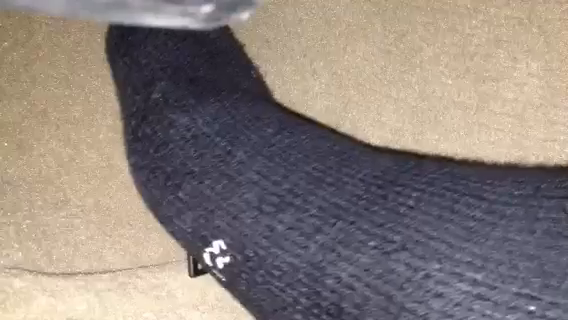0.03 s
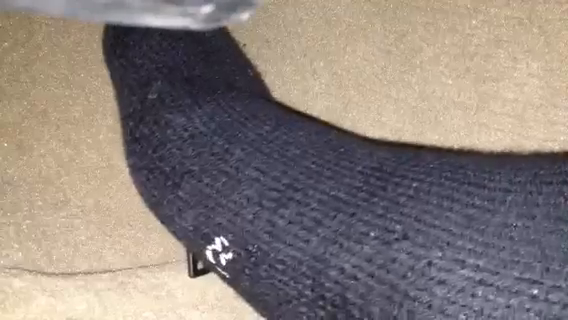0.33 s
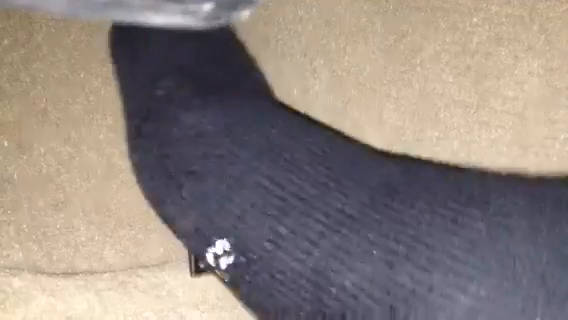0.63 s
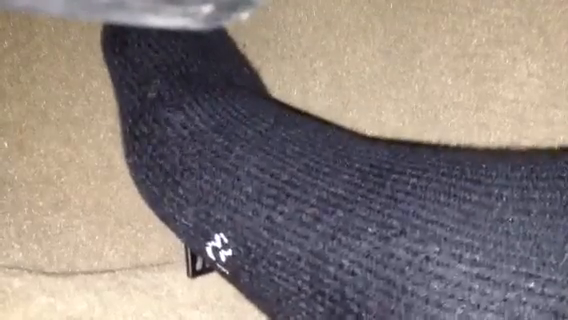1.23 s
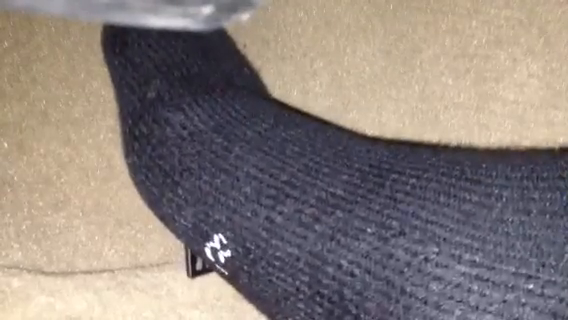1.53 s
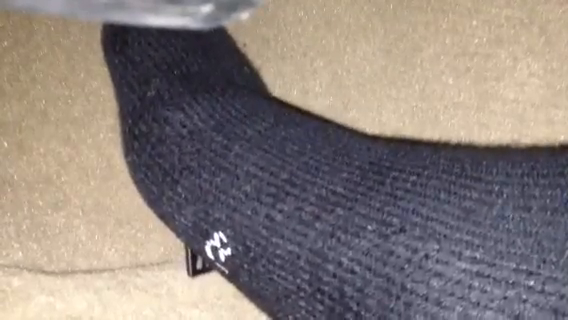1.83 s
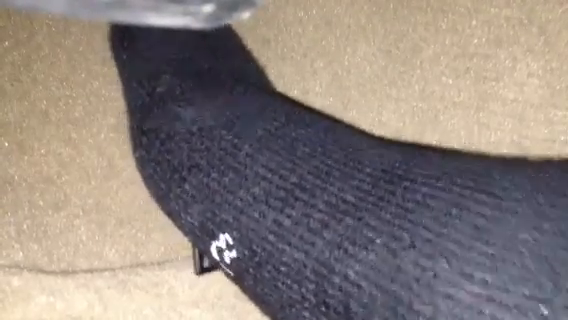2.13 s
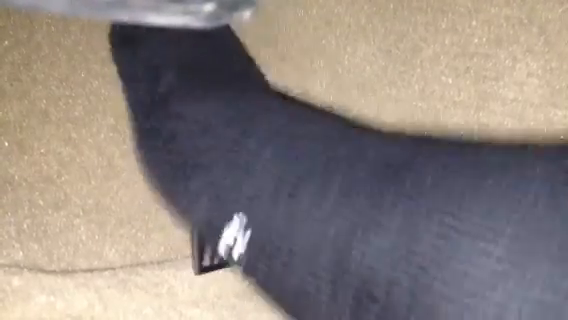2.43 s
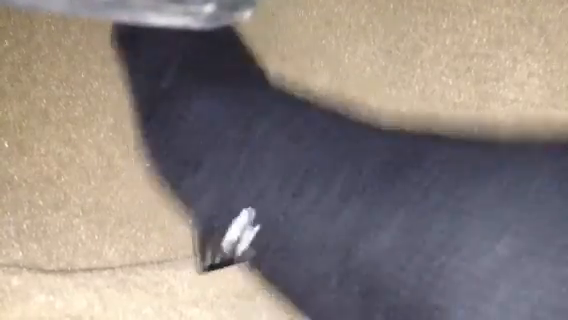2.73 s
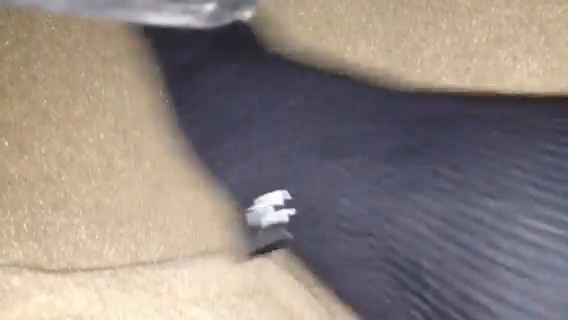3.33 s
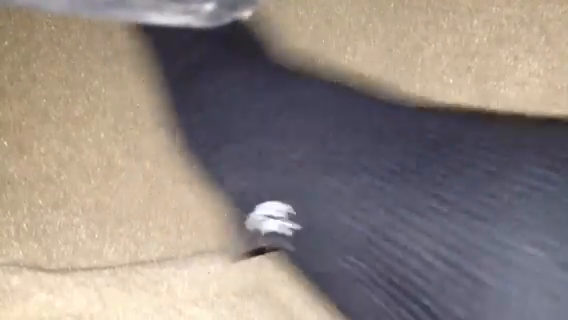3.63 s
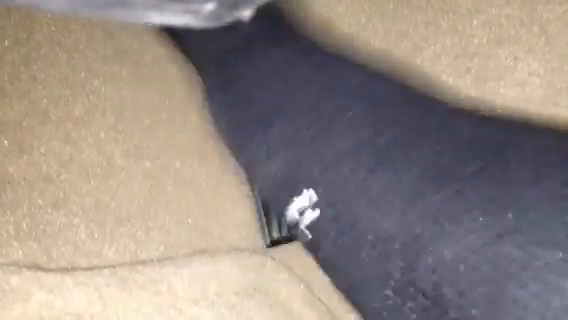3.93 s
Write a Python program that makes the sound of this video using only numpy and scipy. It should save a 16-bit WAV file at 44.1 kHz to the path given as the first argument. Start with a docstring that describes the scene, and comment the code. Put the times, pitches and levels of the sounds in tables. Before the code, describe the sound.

A plastic foot pedal clacks close by in a small carpeted room. It squeaks faintly at the start as a sewing machine settles into soft, rapid chugging, with a low hum and dull knocks. Single pedal clicks come at about 0.6 and 1.6 seconds. From 2.4 to 3.8 seconds the pedal is pumped six times, each push a stocking swish, sharp clack and floor thump, with smaller clicks between.

```python
"""Stockinged foot on a machine pedal

Close by in a small carpeted room, what sounds like a sewing machine runs up to speed and chugs on,
with a low hum, a faint whine and dull knocks from its frame. Its plastic pedal squeaks, clicks twice,
then is pumped against its stop: each push is a swish of stocking, a sharp clack and a floor thump."""
import sys
import numpy as np
from scipy import signal
from scipy.fft import rfft, irfft, next_fast_len
from scipy.io import wavfile
from scipy.ndimage import uniform_filter1d, map_coordinates

SR = 44100
rng = np.random.default_rng(int(sys.argv[2]) if len(sys.argv) > 2 else 0)


def int16_out(signal):
    """Quantize to a 16-bit WAV file."""
    q = np.round(np.clip(np.atleast_2d(signal).T, -1, 1) * 32767)
    wavfile.write(sys.argv[1], SR, q.astype(np.int16))


N = 176400
PUMPING_START_S = 2.08  # from here the stocking rustles and the machine's strokes soften


def amp(db):
    """Decibels to gain."""
    return 10 ** (np.asarray(db) / 20)


def unit(x):
    """Scale to rms 1."""
    return x / np.sqrt(np.mean(x ** 2) + 1e-20)


def clock(size):
    """Seconds for each sample."""
    return np.arange(size) / SR


def filtered(x, response):
    """Filter x by a response given as a function of frequency."""
    size = next_fast_len(len(x) + SR // 2)
    return irfft(rfft(x, size) * response(np.fft.rfftfreq(size, 1 / SR)), size)[:len(x)]


def eq_gain(colour, f):
    """Gain at frequencies f of a colour: an EQ curve whose rows are frequency in Hz, relative dB."""
    hz, db = np.transpose(colour)
    return amp(np.interp(np.log(f + 1), np.log(hz), db))


def noise(colour):
    """Coloured noise of rms 1."""
    return unit(filtered(rng.standard_normal(N), lambda f: eq_gain(colour, f)))


def burst(colour, envelope, white):
    """A very short noise hit, roughly flattened and then given its colour."""
    spectrum, f = rfft(white * envelope), np.fft.rfftfreq(len(envelope), 1 / SR)
    coarse = np.sqrt(np.abs(uniform_filter1d(np.abs(spectrum) ** 2, size=161)) + 1e-20)
    hit = irfft(spectrum / coarse * eq_gain(colour, f), len(envelope))
    hit[len(hit) // 2:] = 0  # drop the filter's wrapped-around pre-ring
    return unit(hit) * np.sqrt(np.mean(envelope ** 2))


def wobble(rate):
    """A smooth random curve, rate knots a second."""
    return map_coordinates(rng.standard_normal(int(N * rate / SR) + 4), [clock(N) * rate])


def fade(t, t60):
    """Exponential decay, 60 dB down after t60 seconds."""
    return amp(-60 * t / t60)


def strike(t, attack_s, t60_s, decay_from_s=0):
    """A percussive envelope: linear attack, exponential decay."""
    return np.minimum(t / attack_s, 1) * fade(np.maximum(t - decay_from_s, 0), t60_s)


def swell(middle_s, half_s):
    """A bell-shaped rise and fall."""
    return np.exp(-((clock(N) - middle_s) / half_s) ** 2 / 2)


def ring(modes, t, scatter_db, ratio):
    """Damped modes, the k-th weighted by ratio ** k; a negative ratio alternates their polarity."""
    out = np.zeros(len(t))
    for k, (hz, db, t60) in enumerate(modes):
        gain = ratio ** k * amp(db + scatter_db * rng.standard_normal())
        out += gain * fade(t, t60) * np.sin(2 * np.pi * hz * t)
    return out


def add(track, start_s, sound):
    """Mix a sound in at a time."""
    part = track[max(0, round(start_s * SR)):][:len(sound)]
    part += sound[:len(part)]


def machine():
    """Strokes tap and chug over a growing hum; the motor's whine climbs once in every stroke."""
    # Colours of the soft chug, light tap and low hum. Each row: frequency in Hz, relative level in dB.
    chug_colour = [(60, -41), (130, 2.5), (260, 1), (390, -1.5), (480, -13), (560, -5), (650, -26),
                   (800, -16), (1150, -21), (1500, -27.5), (2000, -38), (5000, -40.5), (15000, -60)]
    tap_colour = [(150, -24), (380, 7.5), (560, -8), (670, 4.5), (820, 3.5), (1150, -7.5), (1500, 0),
                  (1900, -22), (4000, -24), (15000, -54)]
    hum_colour = [(20, -29), (45, -51), (70, -13.5), (105, -6), (135, -3), (165, 2), (205, -5.5),
                  (280, -9.5), (400, -16), (600, -24), (1000, -32), (2000, -67), (8000, -57.5)]
    # The hum's slow build. Each row: time in seconds, level in dB.
    hum_build = [(0, -58.5), (.28, -54), (.55, -52.5), (1.1, -51), (2.2, -50.5), (3, -49.5), (4, -48.5)]
    settled_start_s, stroke_s, run_up_s, run_up_strokes = 0.1621, 0.0862, 0.091, 1.2
    chug_db, scatter_db, tap_db, tap_lead_s, ease_db, waver_db = -50.5, 1.5, -56, 0.015, -1.5, 0.73
    whine_db, base_hz, sweep_hz, run_up_hz, whine_lag_s = -82, 10700, 1000, 2440, 0.018
    t, k = clock(N), np.arange(int(N / SR / stroke_s) + 2)
    # The strokes quicken and settle to a steady beat.
    times = settled_start_s + k * stroke_s - run_up_s * np.exp(-k / run_up_strokes)
    gains = amp(chug_db + scatter_db * rng.standard_normal(len(k)))
    chugs = sum(gain * swell(s, half_s=0.014) for s, gain in zip(times, gains)) * noise(chug_colour)
    tap = amp(tap_db) * strike(clock(SR // 5), attack_s=0.008, t60_s=0.095, decay_from_s=0.008)
    tap_envelope = np.zeros(N)
    for s in times[1:]:
        add(tap_envelope, s - tap_lead_s, tap)
    hum = amp(np.interp(t, *np.transpose(hum_build)) + waver_db * wobble(18)) * noise(hum_colour)
    turns = np.interp(t - whine_lag_s, times, k)
    whine_hz = base_hz + sweep_hz * (turns % 1) - run_up_hz * np.exp(-turns / run_up_strokes / 2)
    whine = amp(whine_db) * np.sin(np.pi * (turns % 1)) * np.sin(2 * np.pi * np.cumsum(whine_hz) / SR)
    ease = amp(ease_db * (t > PUMPING_START_S))
    return ease * (chugs + tap_envelope * noise(tap_colour)) + hum + whine


def room_air():
    """A faint, steady bed of hiss."""
    # The colour of the air. Each row: frequency in Hz, relative level in dB.
    air_colour = [(100, 9.5), (1500, 6), (3000, 1.5), (4500, 0.5), (7000, 3.5), (8500, 1), (10000, -5),
                  (12000, 0.5), (15500, -2.5)]
    return amp(-68) * noise(air_colour)


def pivot_squeaks():
    """The pedal's pivot gives faint, rough squeaks that sag in pitch."""
    # The squeaks. Each row: start in seconds, length in seconds, opening pitch in Hz, level in dB.
    squeaks = [(.023, .014, 890, -52), (0.02, 0.074, 1310, -60), (0.164, 0.016, 900, -58),
               (0.212, 0.02, 1310, -62)]
    sag_per_s, roughness = 0.6, 0.05
    out = np.zeros(N)
    for s, length, hz, db in squeaks:
        t = clock(int(length * SR))
        pitch = hz * (1 - sag_per_s * t + roughness * wobble(380)[:len(t)])
        arch = np.sqrt(np.abs(np.sin(np.pi * t / length)))
        add(out, s, amp(db) * arch * np.sin(2 * np.pi * np.cumsum(pitch) / SR))
    return out


def frame_thuds():
    """Dull, quickly damped knocks of the machine's frame."""
    # The knocks. Each row: start in seconds, pitch in Hz, level in dB.
    thuds = [(.198, 325, -41.5), (0.309, 273, -38.5), (.756, 300, -40.5), (1.185, 298, -37.5),
             (1.448, 260, -41), (1.622, 235, -37), (2.104, 229, -36), (2.302, 257, -33),
             (3.912, 212, -34.5)]
    overtone_ratio, overtone_db = 1.552, -10
    out, t = np.zeros(N), clock(SR // 4)
    envelope = strike(t, attack_s=0.0025, t60_s=0.071)
    for s, hz, db in thuds:
        phase = 2 * np.pi * hz * t
        tone = np.sin(phase) + amp(overtone_db) * np.sin(overtone_ratio * phase)
        add(out, s, amp(db) * envelope * tone)
    return out


def stocking():
    """Fabric slides as the leg moves: a grainy rub and a finer hiss, plus a rustle while it pumps."""
    # The slides. Each row: middle in seconds, half length in seconds, rub in dB, hiss in dB.
    swishes = [(0.437, 0.029, -72, -64.5), (0.587, 0.068, -63.5, -63), (0.671, 0.027, -65, -62.5),
               (2.26, 0.04, -52.5, -62), (2.378, 0.019, -48, -56.5), (2.532, 0.032, -56.5, -65),
               (2.616, 0.046, -49.5, -61), (2.797, 0.04, -54, -58), (2.902, 0.019, -51, -57.5),
               (3.088, 0.03, -50.5, -58), (3.179, 0.022, -47, -55), (3.357, 0.037, -50.5, -56),
               (3.474, 0.022, -47.5, -56), (3.656, 0.031, -49.5, -57), (3.791, 0.042, -49.5, -58.5),
               (3.948, 0.03, -48.5, -56)]
    # Colours of the rub and the hiss. Each row: frequency in Hz, relative level in dB.
    rub_colour = [(100, -36), (250, 4.5), (420, 2.5), (700, 1.5), (1400, -6), (1700, -7), (2300, -4.5),
                  (3100, -11.5), (4500, -15), (6500, -48), (15000, -55)]
    hiss_colour = [(1000, 4), (2800, -8.5), (4500, -1), (6000, 1), (8000, 1), (10000, -4), (13000, -3),
                   (15500, -13.5)]
    rustle_db, rustle_rise_s, rub_grain_db, hiss_grain_db = -63, 0.063, 2, 1.4
    rustle = amp(rustle_db) * np.clip((clock(N) - PUMPING_START_S) / rustle_rise_s, 0, 1)
    rub_power = sum((amp(db) * swell(s, half)) ** 2 for s, half, db, _ in swishes)
    hiss_power = rustle ** 2 + sum((amp(db) * swell(s, half)) ** 2 for s, half, _, db in swishes)
    rub = unit(noise(rub_colour) * amp(rub_grain_db * wobble(250)))
    hiss = unit(noise(hiss_colour) * amp(hiss_grain_db * wobble(400)))
    return np.sqrt(rub_power) * rub + np.sqrt(hiss_power) * hiss


def pedal_stop():
    """Plastic cracks on plastic, the shell clacks and rings, then the pedal thumps the floor."""
    # Hits on the stop. Each row: start in seconds, then thump, clack and crack faders in dB.
    stops = [(0.5696, -38.5, -38.5, -46), (2.3991, -25, -33.5, -30.5), (2.6458, -23.5, -30.5, -29.5),
             (2.9056, -23.5, -30.5, -30), (3.2007, -22.5, -28, -23.5), (3.4941, -24.5, -30, -32.5),
             (3.8207, -29, -35.5, -38.5)]
    # Modes of the shell, and of the pedal on the floor.
    # Each row: frequency in Hz, relative level in dB, time to fall 60 dB in seconds.
    shell_modes = [(578, -2, 0.038), (648.5, -.5, 0.055), (831, -9.5, 0.05), (968, -6, .045),
                   (1330, -1.5, 0.038), (1452, -6, 0.03), (1680, -9.5, 0.033), (2173, -10.5, 0.034),
                   (2868, -6, 0.028), (3560, -8.5, 0.019), (4484, -11.5, 0.033), (7450, -6, 0.018),
                   (8460, -6, 0.012)]
    floor_modes = [(125, -17, 0.27), (174, -6, 0.14), (212, -17, .1), (245, 4.5, 0.056), (323, -4, 0.048),
                   (405, -6, 0.035)]
    # Colours of the bright crack and the woodier clack. Each row: frequency in Hz, relative level in dB.
    crack_colour = [(1000, -4), (3000, -6), (5000, -10.5), (6600, 1), (8300, 0), (9500, -7.5),
                    (12000, -13.5), (15500, -26)]
    clack_colour = [(120, -28), (400, 2), (620, 8), (780, -3), (980, 1.5), (1130, -9.5), (1380, 7),
                    (2000, -9), (3100, -7), (4500, -7.5), (6000, -15), (15000, -32)]
    crack_trim_db, clack_trim_db, contact_s, fresh_noise = 1.5, -1, 0.0012, 0.49
    thump_delay_s, thump_attack_s, low_cut_hz = 0.00553, 0.001, 119
    plastic, thumps, t = np.zeros(N), np.zeros(N), clock(SR // 3)
    crack_envelope = strike(t, attack_s=contact_s, t60_s=0.017, decay_from_s=0.0013)
    clack_envelope = strike(t, attack_s=0.0021, t60_s=0.027, decay_from_s=0.0021)
    shared_noise = rng.standard_normal((2, len(t)))  # makes every hit sound like the same pedal
    for s, thump_db, clack_db, crack_db in stops:
        white = shared_noise + fresh_noise * rng.standard_normal(shared_noise.shape)
        crack = amp(crack_trim_db) * burst(crack_colour, crack_envelope, white[0])
        clack = amp(clack_trim_db) * burst(clack_colour, clack_envelope, white[1])
        shell = ring(shell_modes, t, scatter_db=2.5, ratio=-0.99) * np.minimum(t / contact_s, 1)
        thump = ring(floor_modes, t, scatter_db=0.44, ratio=0.97) * (1 - np.exp(-t / thump_attack_s))
        add(plastic, s, amp(crack_db) * crack + amp(clack_db) * (clack + shell))
        add(thumps, s + thump_delay_s, -amp(thump_db) * thump)
    low_cut = signal.butter(4, low_cut_hz, 'high', fs=SR, output='sos')
    return plastic + signal.sosfilt(low_cut, thumps)


def linkage_clicks():
    """Play in the pedal's linkage: a bright tick and a short snap over a hollow knock."""
    # The clicks. Each row: start in seconds, then tick, snap and knock faders in dB.
    clicks = [(1.601, -39.5, -35, -36.5), (2.584, -62, -40, -47.5), (3.37, -62, -48, -39.5),
              (3.655, -58, -36.5, -40), (3.743, -34, -30.5, -35.5), (3.903, -60, -42, -38.5)]
    # Colours of the tick and the snap. Each row: frequency in Hz, relative level in dB.
    tick_colour = [(2000, -10), (4500, -9), (7000, -0.5), (9000, -13), (11000, -22), (15000, -24)]
    snap_colour = [(120, -28), (600, 0), (1200, 5.5), (1700, -4.5), (2300, -1.5), (3400, -23), (7000, -28),
                   (15000, -44)]
    # Linkage modes. Each row: typical frequency in Hz, relative level in dB, 60 dB decay in seconds.
    knock_modes = [(268, -11, 0.08), (386, 1, 0.085), (520, -4, 0.03)]
    attack_s, pitch_spread = 0.00062, 0.06
    out, t = np.zeros(N), clock(SR // 3)
    tick_envelope, snap_envelope = strike(t, attack_s, t60_s=0.01), strike(t, attack_s, t60_s=0.017)
    for s, tick_db, snap_db, knock_db in clicks:
        tick = burst(tick_colour, tick_envelope, rng.standard_normal(len(t)))
        snap = burst(snap_colour, snap_envelope, rng.standard_normal(len(t)))
        varispeed = 1 + pitch_spread * rng.standard_normal()
        knock = ring(knock_modes, t * varispeed, scatter_db=0, ratio=-1.04)
        add(out, s, amp(tick_db) * tick + amp(snap_db) * snap + amp(knock_db) * knock)
    return out


def room_reverb(x):
    """The short, dull answer of a carpeted room."""
    wet_db, t60_s, damping_hz = -21.5, 0.091, 2200
    t = clock(SR // 2)
    tail = filtered(rng.standard_normal(len(t)) * fade(t, t60_s), lambda f: 1 / (1 + 1j * f / damping_hz))
    return amp(wet_db) * signal.fftconvolve(x, tail / np.linalg.norm(tail))[:N]


def scene():
    """A mono mix: knocks and squeaks get a touch of room; stocking, machine and air stay dry."""
    contacts = pedal_stop() + linkage_clicks() + pivot_squeaks() + frame_thuds()
    return (contacts + room_reverb(contacts) + stocking() + machine() + room_air())[None]


def record(dry):
    """A steep high cut takes off the very top of the treble."""
    high_cut_hz = 15700
    return np.array([filtered(x, lambda f: 1 / (1 + (f / high_cut_hz) ** 160)) for x in dry])


dry = scene()
out = record(dry)
int16_out(out)
```